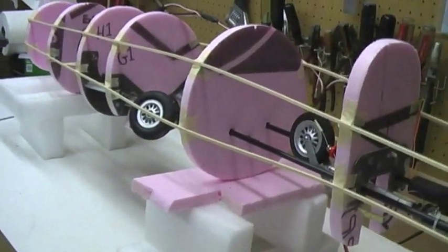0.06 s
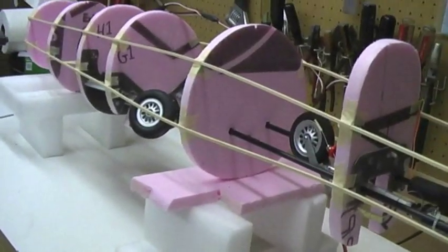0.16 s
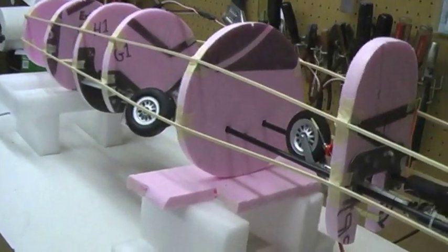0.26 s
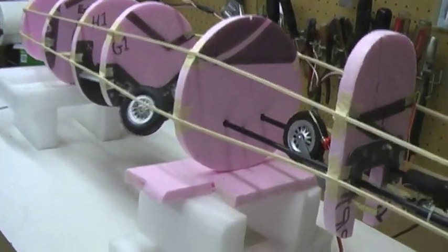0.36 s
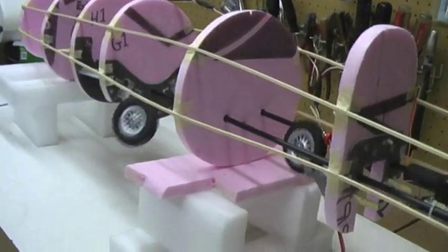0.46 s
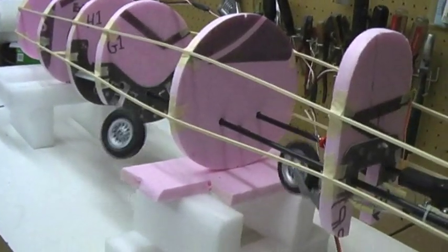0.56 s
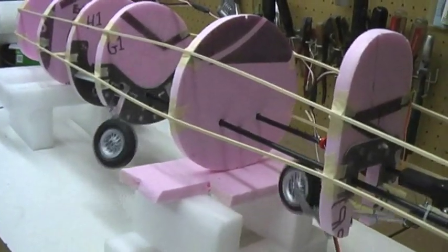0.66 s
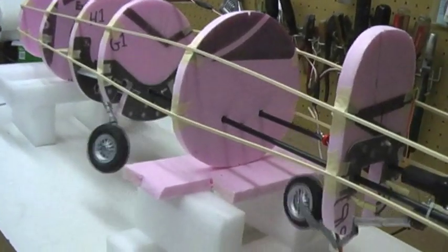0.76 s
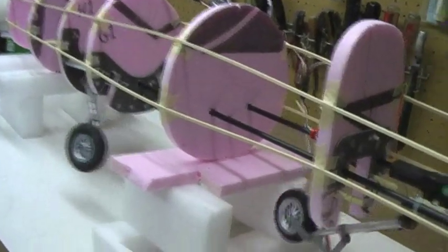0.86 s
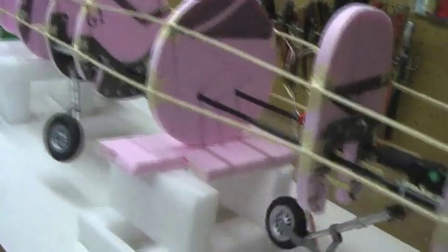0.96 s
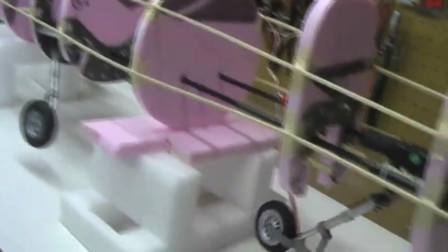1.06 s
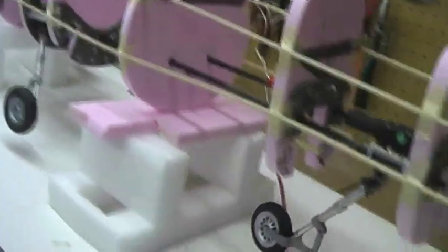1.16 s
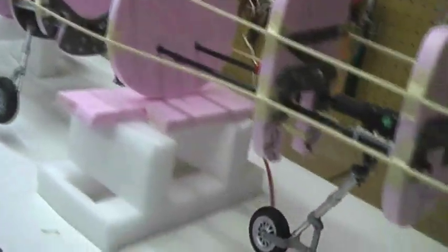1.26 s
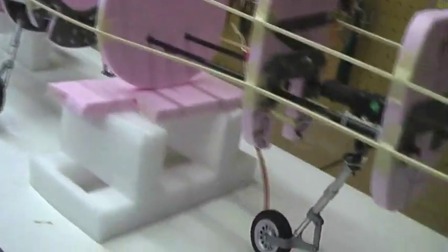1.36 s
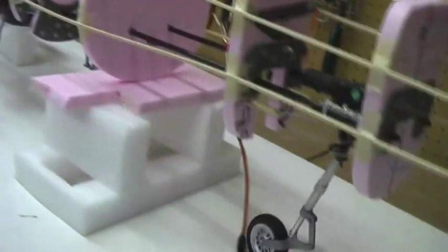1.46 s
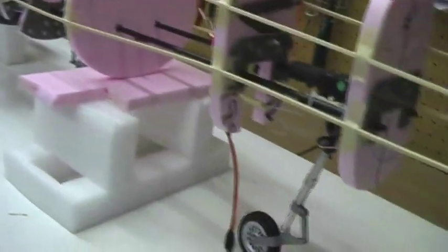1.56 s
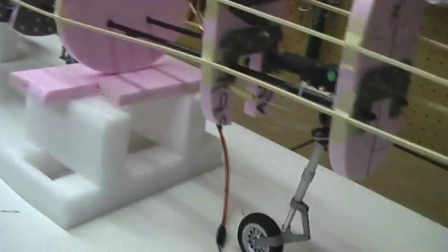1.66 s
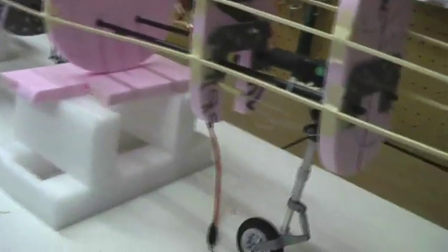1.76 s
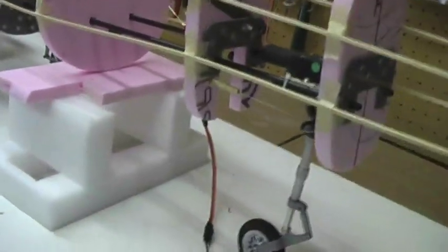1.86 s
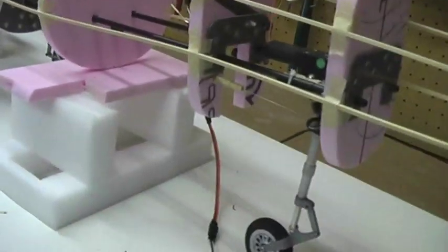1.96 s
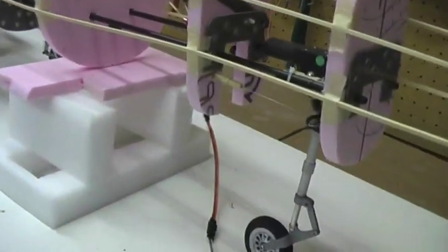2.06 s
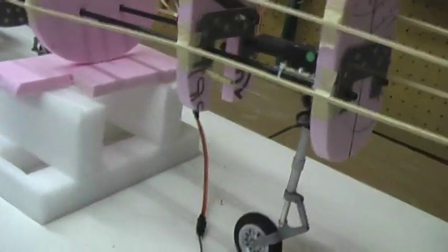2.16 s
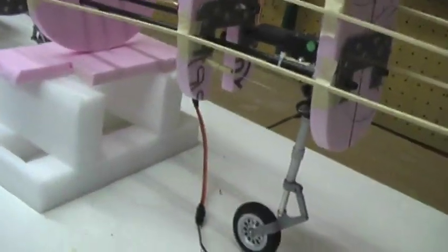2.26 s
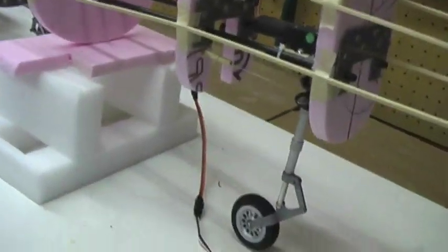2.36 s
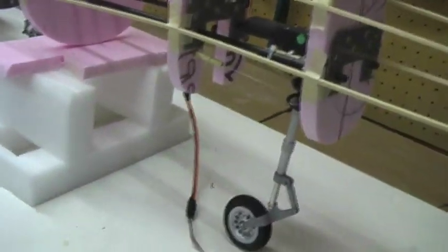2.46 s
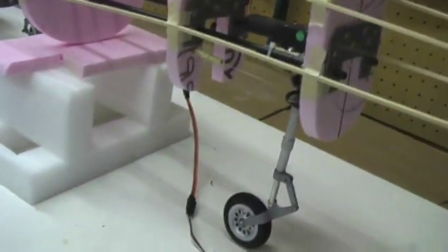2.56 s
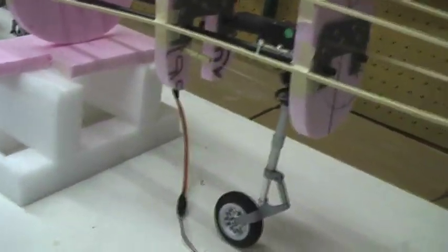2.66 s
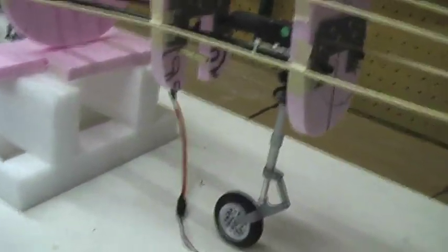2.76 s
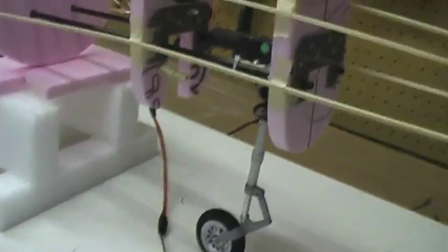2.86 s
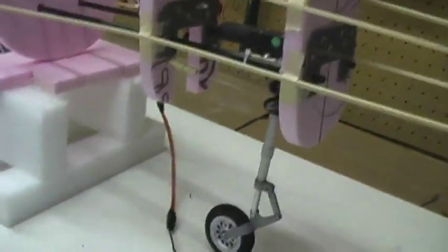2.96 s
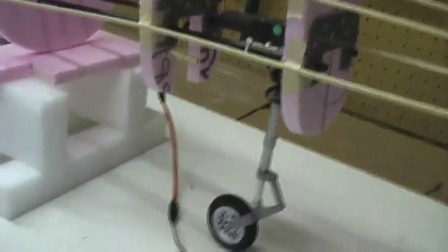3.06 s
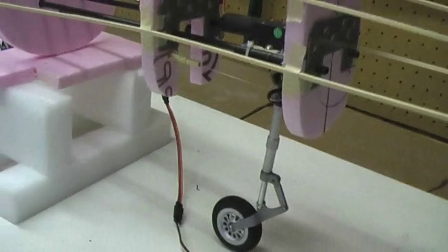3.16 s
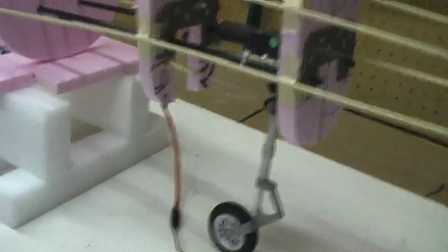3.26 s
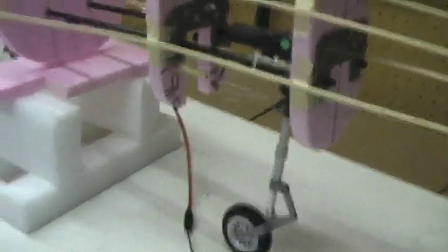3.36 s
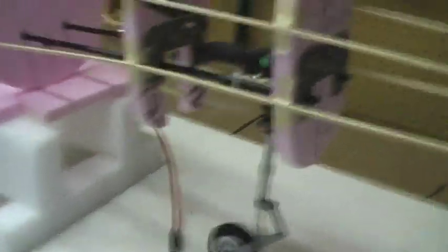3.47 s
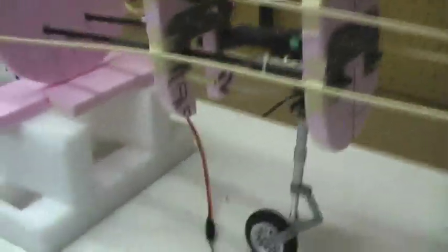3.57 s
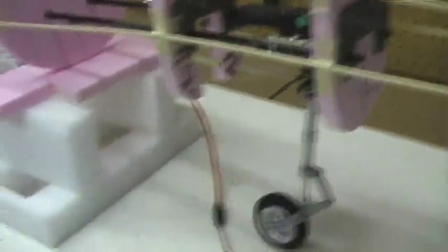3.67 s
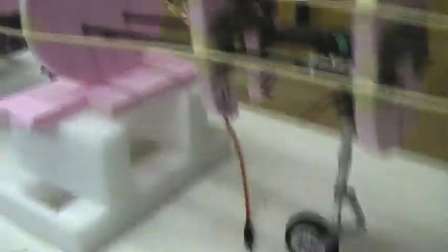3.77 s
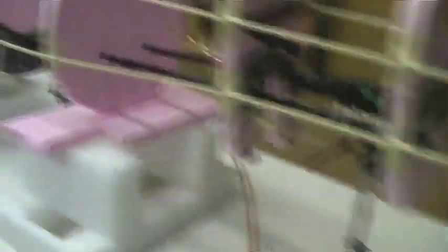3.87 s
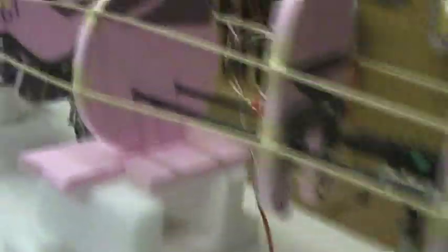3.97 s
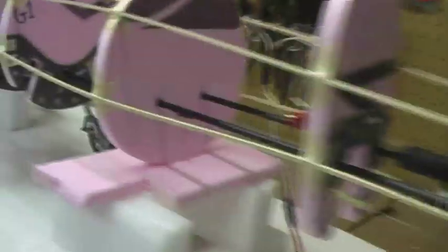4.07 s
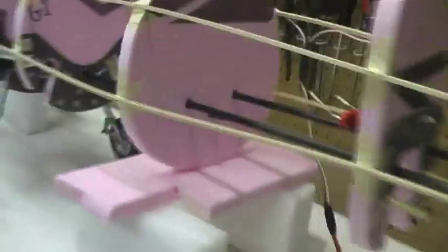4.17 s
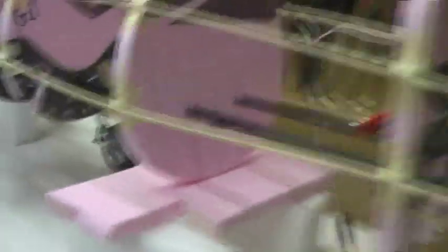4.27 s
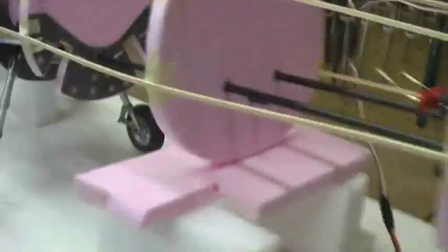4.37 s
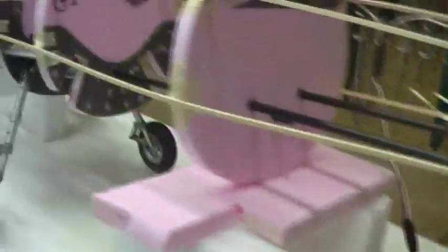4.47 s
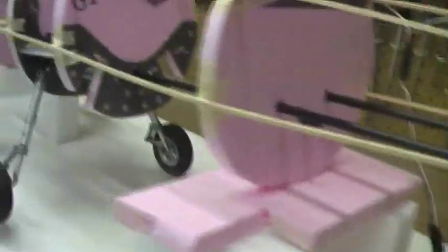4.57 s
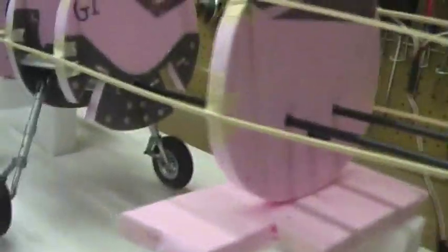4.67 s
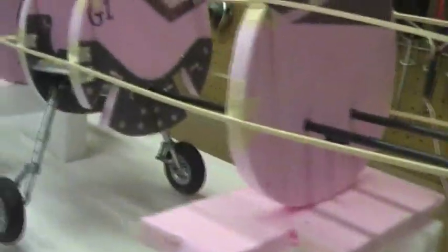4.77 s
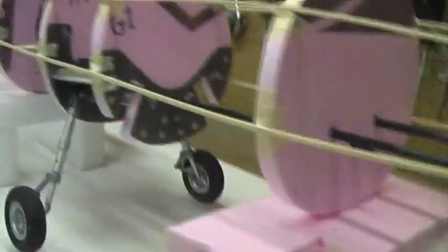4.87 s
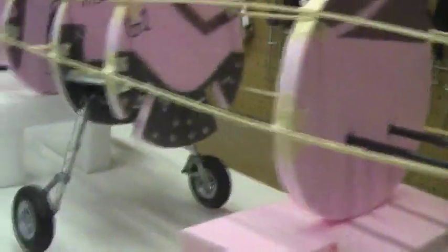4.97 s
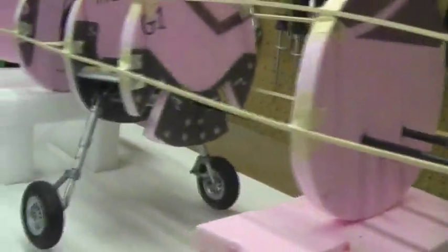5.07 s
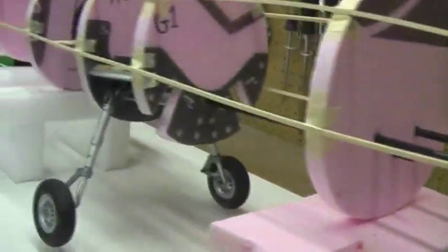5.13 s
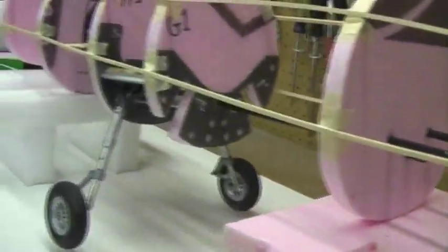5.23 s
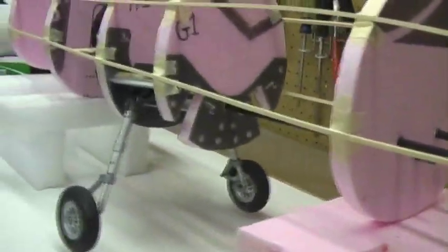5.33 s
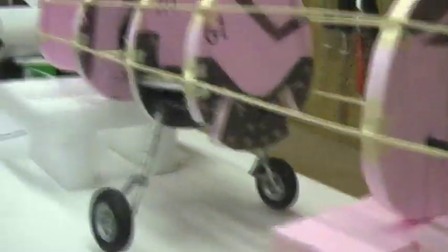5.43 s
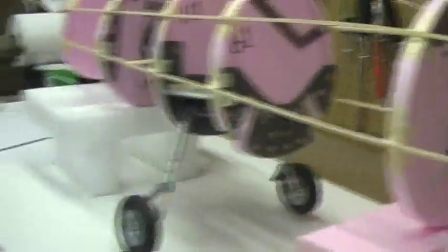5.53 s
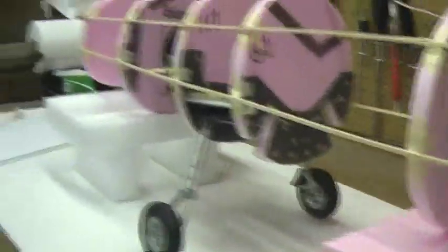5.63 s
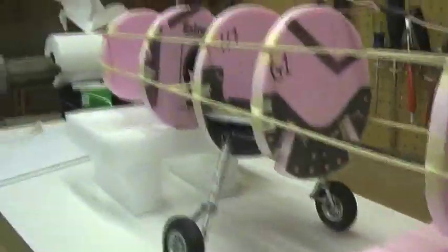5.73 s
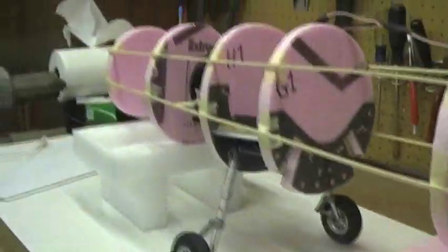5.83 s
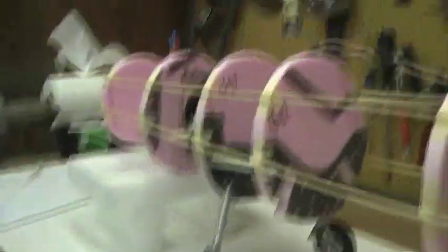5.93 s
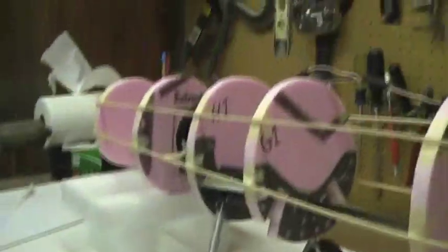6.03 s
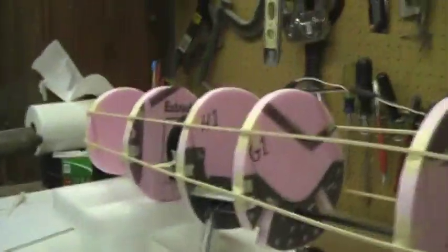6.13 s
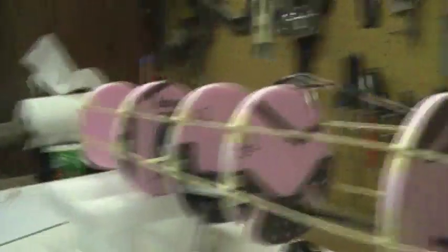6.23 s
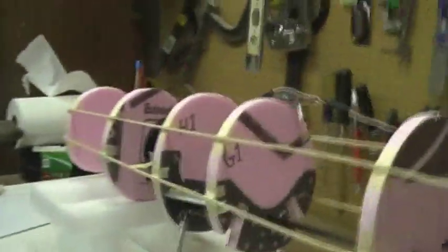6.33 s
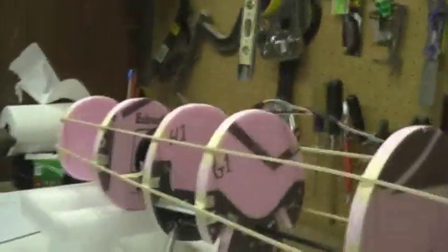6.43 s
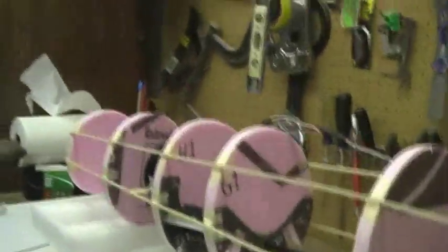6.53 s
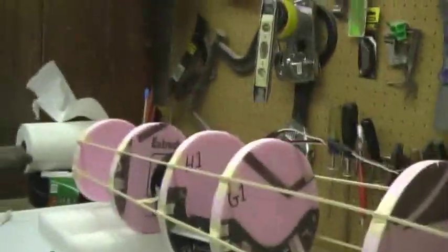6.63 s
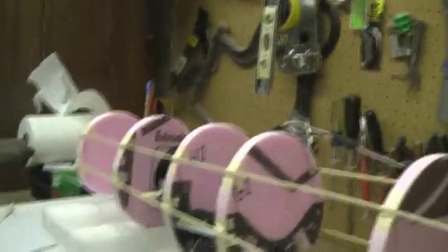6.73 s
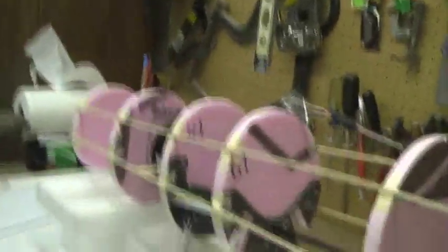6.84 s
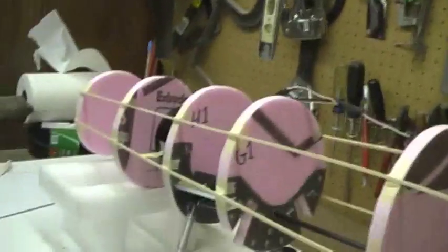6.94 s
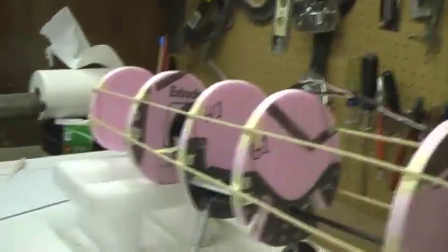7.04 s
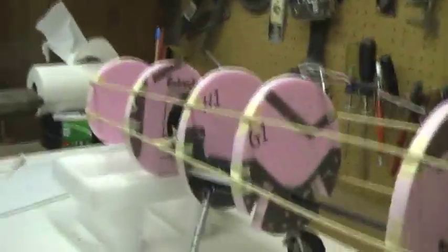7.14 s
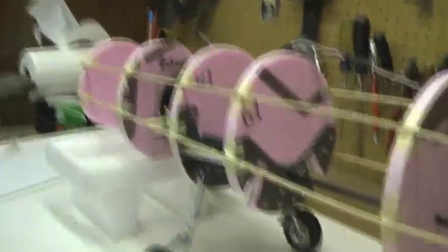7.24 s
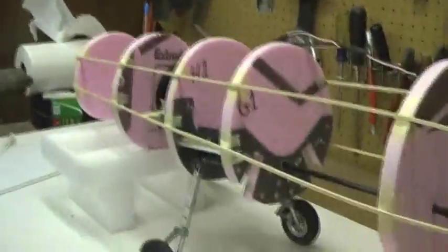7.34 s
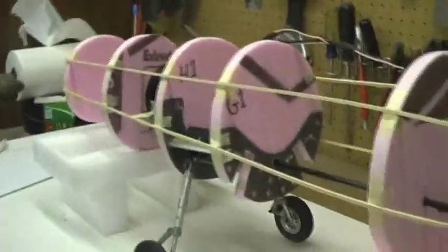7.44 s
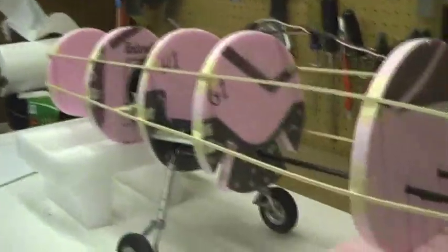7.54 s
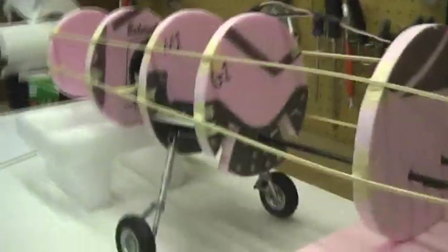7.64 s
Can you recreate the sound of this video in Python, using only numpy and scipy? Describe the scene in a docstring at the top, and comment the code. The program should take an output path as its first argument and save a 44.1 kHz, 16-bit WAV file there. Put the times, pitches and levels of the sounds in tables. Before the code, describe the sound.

A small, quiet workshop with low room tone and soft hiss, heard through a close stereo microphone. A very faint scuff comes at 0.15 s. At 0.3 s three tiny geared motors start abruptly, filling the centre with a bright, buzzy whine and gritty plastic grinding, slightly beating pitches and a low rotor hum. One motor drops out near 1.7 s and another by 1.8; the nearest labours downward in steps to its lowest around 2.0, climbs again and stops at 2.2 with a brief metallic strut ring. Quiet until faint hollow creaks at 3.1-3.4, then shoes shuffle from 3.5 to 4.7, strongest at 3.8-4.1, with dull knocks, small ticks and a tiny rising rubber squeak at 4.37. Near silence follows, with isolated faint ticks around 5.1-5.3. From 6.26 a hand brushes a surface; from 6.6 sharp ticks, short hollow knocks and crisp rustling cluster close by, drifting left until the end at about 7.7.

```python
"""A faint scuff in a quiet, cluttered room; then three geared motors swing a foam model's landing gear down.
Plastic gear teeth whine (a pulse per tooth contact) and grind (dense random contacts); a strut rings along.
After they stop, someone shuffles along the workshop bench: soles scuff (grains of friction), something creaks,
and a handled thing rustles (more grains), ticks and knocks (dying rings). A close stereo microphone hears it."""
import sys
import numpy as np
from scipy import signal
from scipy.fft import rfft, irfft
from scipy.io import wavfile

SR = 44100
rng = np.random.default_rng(int(sys.argv[2]) if len(sys.argv) > 2 else 0)


def transcribe(signal):
    """Save signal, clipped to [-1, 1], as a 16-bit WAV file at the path in sys.argv[1]."""
    frames = np.atleast_2d(signal).T
    limited = np.clip(frames, -1, 1)
    pcm = np.round(limited * 32767).astype(np.int16)
    wavfile.write(sys.argv[1], SR, pcm)


def gain_from_decibels(decibels):
    """Convert decibel values to linear amplitude factors."""
    exponent = np.asarray(decibels, float) / 20
    return 10 ** exponent


N = 339570   # length of the scene [samples]

# Every table of resonances lists its strength before the lift_db that its user adds.
# broad colour of the room tone: (frequency [Hz], level [dB per Hz])
ROOM_TONE = [(12, -67.5), (20, -50), (45, -4), (107, -5), (234, -11), (284, -20.5), (397, -2.5), (587, -14),
             (675, -10.5), (1030, -13.5), (1600, -16), (1740, -18.5), (9850, -31), (14600, -34.5),
             (15800, -47)]
# hums in the room tone: (frequency [Hz], width [Hz], strength [dB])
ROOM_HUMS = [(256, 28, 2), (405, 200, -6), (815, 15, 1.5)]
# the part of the room tone that each port hears alone: (frequency [Hz], gain [dB])
OWN_HISS = [(60, -6.5), (300, -11.5), (1400, 3.0), (4000, -3.0), (15000, 9.0)]
# echoes in the bass, middle and treble: (typical frequency [Hz], time to fall 60 dB [s])
ROOM_DECAY = [(200, 0.5), (2000, 0.16), (10000, 0.191)]
# what the two ports hear unlike each other, before each source's share: (frequency [Hz], side to mid [dB])
SCATTER = [(60, -16), (130, -14.5), (290, -29.5), (640, -17.5), (1410, -36.5), (3100, -14.5), (6820, -10.5),
           (15000, 2)]
# a gentle treble shelf, then a steep cutoff near 15.3 kHz: (frequency [Hz], gain [dB])
TREBLE_CUTOFF = [(20, 0), (12500, 0), (14000, -4), (15100, -3), (15500, -30), (20000, -40)]

# colour of a sole on the floor: (frequency [Hz], level [dB per Hz])
SCUFF = [(35, -57), (60, -32.5), (175, -4.5), (426, -7), (577, -10), (663, -4), (1190, -5), (2230, -7),
         (11400, -11), (14100, -22), (15800, -63)]
# hollow rings of the floor: (frequency [Hz], width [Hz], strength [dB])
SCUFF_MODES = [(494, 64, 1), (2310, 400, -3), (3500, 400, -12)]
# weight rolls onto a foot, dull:
# (peak time [s], rumble [dB], body against rumble [dB], rise by 20 dB [s], fall by 20 dB [s])
TREADS = [(.15, -68, 8, .1, .13), (3.3, -57, 0, .35, .6), (3.47, -58, 10, .12, .09),
          (3.575, -53, -1, .07, .1), (3.682, -57, 7, .02, .08), (3.76, -45, -2, .008, .2),
          (3.9, -39, -7, .015, .085), (3.99, -62, 7, .1, .2), (4.07, -50, 1, .01, .2),
          (4.13, -47, 5, .12, .065), (4.38, -53, -4, .06, .03), (4.45, -51, -2, .05, .25),
          (4.51, -51, -2, .1, .07), (4.7, -56, 1, .11, .16), (5.46, -73, 14, .12, .08)]
# a sole slides, bright:
# (peak time [s], scratch [dB], hiss against scratch [dB], rise by 20 dB [s], fall by 20 dB [s])
SLIDES = [(.126, -62, -6, .09, .13), (3.33, -63, -2, .22, .4), (3.472, -39.5, -7, .055, .07),
          (3.57, -58, -5, .1, .2), (3.685, -48.5, -7, .025, .085), (3.825, -36, -3.5, .075, .085),
          (3.99, -53, -2, .6, .14), (4.1, -31.5, -13, .028, .08), (4.27, -64, -1, .3, .3),
          (4.38, -59, 4, .12, .15), (4.49, -46.5, -3, .1, .07), (4.67, -55.5, -5, .11, .2),
          (5.46, -70, 15, .13, .06), (6.1, -68, -3, 1.5, .5)]
# something hollow creaks under the shifting weight:
# (peak time [s], level [dB], ring [Hz], rise by 20 dB [s], fall by 20 dB [s])
CREAKS = [(3.115, -58, 490, .02, .5), (3.18, -57, 480, .15, .12), (3.25, -52, 510, .04, .1),
          (3.315, -56, 1310, .06, .09), (3.385, -55, 520, .08, .08)]
# colour of the slips behind a creak: (frequency [Hz], level [dB per Hz])
CREAK_SLIPS = [(20, -30), (1500, -30), (6000, -55), (20000, -60)]

# a hand brushes a surface:
# (peak time [s], hiss [dB], low rub against hiss [dB], rise by 20 dB [s], fall by 20 dB [s])
BRUSHES = [(6.264, -47.5, -6, .012, .14), (6.35, -55, -8, .1, .6), (6.46, -48, -9, .17, .2),
           (6.53, -54, 1, .2, .2), (6.65, -53.5, 3, .2, .17), (6.78, -53, -4, .2, .02)]
# colour of the handled material: (frequency [Hz], level [dB per Hz])
RUSTLE = [(35, -42.5), (60, -15), (113, 1), (146, -11), (216, 3.5), (307, -2), (501, -6.5), (619, -11),
          (818, -5.5), (3020, -10.5), (6090, -2), (14400, -21), (15800, -31.5)]
# the handled material over time: (time [s], low rustle [dB], bright rustle [dB])
HANDLING = [(6.785, -44, -42.5), (6.83, -52, -45), (6.975, -53, -48), (7.005, -55, -42), (7.12, -53, -43.5),
            (7.245, -58, -44), (7.256, -60, -39), (7.305, -58, -42), (7.32, -64, -48), (7.39, -52, -42.5),
            (7.443, -50, -43), (7.51, -57, -52), (7.575, -67, -60.5), (7.63, -57, -55), (7.7, -56, -47.5)]
# where the handling is heard: (time [s], left over right [dB])
HANDLING_PAN = [(6.2, -1.5), (6.7, 1.5), (7.2, 1.5), (7.7, 5.5)]
# sharp ticks: (time [s], level before ring and crack take their shares [dB], ring [Hz])
TICKS = [(3.6731, -39.5, 3090), (4.0634, -36.5, 4590), (4.2383, -39, 2500), (4.4144, -40, 6940),
         (4.4308, -38.5, 2570), (5.119, -40, 4100), (5.255, -50, 4100), (6.6104, -32.5, 4560),
         (6.6478, -21.5, 4350), (6.6544, -24, 3900), (6.7855, -15.5, 5820), (6.7974, -23.5, 6270),
         (6.8054, -19.5, 6950), (6.8179, -29, 4470), (6.8473, -23, 6820), (7.1184, -25.5, 4240),
         (7.1754, -29.5, 6230), (7.226, -23.5, 5444), (7.2509, -15, 2740), (7.259, -25, 2400),
         (7.267, -27, 3300), (7.2774, -16, 5540), (7.2953, -18.5, 5245), (7.3372, -30, 4490),
         (7.3637, -21.5, 5740), (7.438, -25.5, 6330), (7.6161, -30.5, 5750), (7.649, -31, 5830)]
# the ticking thing moves left: (time [s], left over right [dB])
TICK_PAN = [(6.2, -1.5), (6.9, 2.5), (7.3, 5), (7.7, 8)]
# colour of a tick's crack: (frequency [Hz], level [dB per Hz])
SNAP = [(500, -26.5), (2000, -2), (3000, -0.5), (6500, -2.5), (10000, -9.5), (15000, -19)]
# dull knocks: (time [s], level before each ring takes its share [dB], main ring [Hz], fall by 60 dB [s])
KNOCKS = [(3.671, -51, 466, 0.04), (3.758, -35.5, 470, 0.058), (3.89, -27, 450, 0.037),
          (4.064, -33, 356, 0.048), (4.411, -36, 650, 0.034), (4.43, -36.5, 1030, 0.04),
          (4.443, -40, 236, 0.089), (4.684, -41.5, 248, 0.05), (6.263, -40, 215, 0.077),
          (6.586, -31.5, 234, 0.02), (6.654, -19, 816, 0.032), (6.687, -34, 315, 0.031),
          (6.788, -19, 1290, 0.013), (6.798, -17, 1368, 0.013), (6.815, -30, 363, 0.018),
          (6.85, -35, 186, 0.04), (6.884, -28, 369.5, 0.021), (6.939, -28, 228, 0.044),
          (6.967, -31, 197, 0.025), (7.422, -35, 790, 0.036), (7.585, -45, 363, 0.032),
          (7.616, -28.5, 490, 0.037), (7.649, -28.5, 580, 0.044)]
# rings within one knock: (times the main pitch, level [dB], times the main fall time)
KNOCK_RINGS = [(1, -3.5, 1), (1.35, -8, 1.1), (1.75, -8, .9), (2.3, -12, .5), (2.9, -11, .4)]
# a rubber sole slips: (time [s], length [s], first pitch [Hz], last pitch [Hz], peak [dB])
SQUEAK = (4.366, .029, 360, 530, -32)

# broad colour of the gearboxes: (frequency [Hz], level [dB per Hz])
GEARBOX = [(59, -68.5), (100, -44), (214, -29.5), (593, -20), (646, -15), (887, -13.5), (1300, 0.5),
           (3520, -1.5), (4440, -6), (7230, -7.5), (8940, -3.5), (14600, -11), (15800, -44.5)]
# resonances of the gearboxes: (frequency [Hz], width [Hz], strength [dB])
GEARBOX_MODES = [(1088, 130, -6.5), (1313, 95, -5.5), (2770, 150, -9), (3136, 140, -10), (4410, 130, -2.5),
                 (5180, 120, -5), (5750, 100, -7), (6460, 180, -6.5), (8920, 1400, -9.5),
                 (10160, 200, -7.5)]
# the grinding eases while the near motor labours: (time [s], gain [dB])
GRIND_EASES = [(1.63, 0.5), (1.75, -2.5), (2.09, -3), (2.17, -6), (2.22, 1.5)]
# bass band of the grinding against the whole: (time [s], gain [dB])
GRIND_BASS = [(.5, -21), (1.3, -26), (1.65, -19), (1.92, -20), (2.13, -25), (2.3, -24)]
# treble band of the grinding against the whole: (time [s], gain [dB])
GRIND_TREBLE = [(.32, -5), (.35, 7), (.5, 1), (1.27, 2), (1.63, -1), (1.75, 4.5), (1.92, -3), (2.08, -8),
                (2.11, 4), (2.185, 7), (2.2, -6.5), (2.32, -17)]
# how the housing radiates the tooth whine: (frequency [Hz], gain [dB])
WHINE = [(900, -14.5), (1400, -5), (2300, -4.5), (3200, -7), (4500, -3.5), (5300, -1.5), (6800, -5),
         (8700, 2.5), (10200, -3.5), (12000, -5.5), (15000, -27.5)]
# the near motor spins up, labours in steps and recovers as its leg locks: (time [s], tooth contacts [per s])
NEAR_SPEED = [(.33, 1200), (.385, 1750), (.408, 1750), (.428, 2060), (.8, 2205), (1.75, 2215),
              (1.793, 1765), (1.84, 1775), (1.868, 1465), (1.895, 1445), (1.912, 1190), (1.953, 1125),
              (1.98, 1185), (2.008, 1022), (2.043, 1168), (2.08, 1095), (2.097, 1390), (2.135, 1450),
              (2.156, 1685), (2.193, 1700)]
# one list for each far motor: (time [s], tooth contacts [per s])
FAR_SPEEDS = [
    [(.36, 1700), (.45, 1890), (.6, 1945), (.8, 1985), (1.2, 1960), (1.8, 1930)],
    [(.4, 2000), (.6, 2280), (.9, 2325), (1.45, 2345), (1.5, 2290), (1.685, 2280), (1.705, 1900),
     (1.725, 1550)],
]
# force on the near motor's teeth: (time [s], level [dB])
NEAR_FORCE = [(.33, -35), (.41, -22), (.6, -26.5), (1.0, -33), (1.3, -25), (1.7, -28), (1.8, -21),
              (1.93, -23.5), (2.06, -21), (2.193, -20.5)]
# force on the teeth, one list for each far motor: (time [s], level [dB])
FAR_FORCES = [
    [(.36, -40.5), (.55, -31), (.8, -33.5), (1.2, -39.5), (1.8, -37)],
    [(.4, -42.5), (.9, -29.5), (1.2, -32), (1.45, -33.5), (1.6, -32.5), (1.7, -28), (1.725, -44)],
]
# hum of a three-pole rotor, average levels before they drift:
# (time [s], turns [per s], once a turn [dB], three a turn [dB], six a turn [dB])
ROTOR = [(0.42, 208.7, -67, -49, -50), (0.53, 240, -50.5, -56.5, -43.5), (0.658, 212, -63, -50.5, -51.5),
         (0.76, 222, -55.5, -44, -53.5), (1.404, 214.3, -62, -49, -38), (1.552, 227.1, -47, -44, -36),
         (1.894, 233, -62, -52, -38), (1.95, 228.9, -75.5, -62.5, -47)]


def rms_one(x):
    """Scales a sound to an average (rms) level of 1."""
    return x / np.sqrt(np.mean(x ** 2) + 1e-20)


def in_time(rows):
    """Gives a gate that is open while a curve lasts, then the curve's columns at every sample."""
    s, *columns = np.transpose(rows)
    t = np.arange(N) / SR
    gate = np.clip(np.minimum(t - s[0], s[-1] - t) / .006 + 1, 0, 1)   # 6 ms fades just outside the curve
    return [gate] + [np.interp(t, s, c) for c in columns]


def colour(x, spectrum, modes=(), lift_db=0., low_hz=1, high_hz=30000):
    """Filters by a broad spectrum with resonances on top, between two soft edges."""
    hz = np.fft.rfftfreq(x.shape[-1], 1 / SR) + 1
    power = 1 + sum(gain_from_decibels(2 * (db + lift_db)) / (1 + (2 * (hz - f) / width) ** 2) for f, width, db in modes)
    edges = 1 / np.sqrt((1 + (low_hz / hz) ** 8) * (1 + (hz / high_hz) ** 8))
    points_hz, points_db = np.transpose(spectrum)
    broad = gain_from_decibels(np.interp(np.log(hz), np.log(points_hz), points_db))
    return irfft(rfft(x) * broad * np.sqrt(power) * edges, x.shape[-1])


def drift(rate_hz):
    """Makes a random wander of average size 1: noise smoothed twice, so it changes slowly."""
    r = np.exp(-2 * np.pi * rate_hz / SR)
    noise = rng.standard_normal(N + SR)
    return rms_one(signal.lfilter([1], [1, -2 * r, r * r], noise)[SR:])   # drop the first second, still settling


def grit(per_s, spread_db):
    """Makes dense random contacts: clicks of uneven size, either way up, at chance moments."""
    sizes = gain_from_decibels(spread_db * np.minimum(rng.exponential(1, N), 5)) * rng.choice([-1, 1], N)
    return sizes * (rng.random(N) < per_s / SR)


def rubbing(gains, spectrum, modes, per_s, clump_db):
    """Friction: grains in clumps, split into rumble, body, scratch and hiss with a gain each."""
    grains = grit(per_s, spread_db=1.5) * gain_from_decibels(clump_db * drift(38.0))
    edges_hz = [20, 450, 1500, 4000, 30000]
    parts = [rms_one(colour(grains, spectrum, modes, 5.7, lo, hi)) for lo, hi in zip(edges_hz, edges_hz[1:])]
    return sum(gain * part for gain, part in zip(gains, parts))


def strokes(s, db, rise_s, fall_s):
    """Makes swells that rise to a peak and fall, straight in dB; the strongest one rules."""
    t = np.arange(0, N, 32)[:, None] / SR   # every 32nd sample is enough
    level_db = np.max(db - 20 * np.maximum((s - t) / rise_s, (t - s) / fall_s), axis=1)
    return np.interp(np.arange(N) / SR, t[:, 0], gain_from_decibels(level_db))


def two_bands(rows):
    """Gives the gains of the main band and of its companion for a table of strokes."""
    s, db, share_db, rise_s, fall_s = np.transpose(rows)
    return [strokes(s, db, rise_s, fall_s), strokes(s, db + share_db, rise_s, fall_s)]


def ring(at_s, peak_db, hz, t60):
    """One damped ring: its start sample and a sine that falls 60 dB in t60 seconds."""
    t = np.arange(int(t60 * SR)) / SR
    return round(at_s * SR), gain_from_decibels(peak_db - 60 * t / t60) * np.sin(2 * np.pi * hz * t)


def add(out, start, wave):
    """Mixes a short wave into a long sound, cut off at the end."""
    out[..., start:start + wave.shape[-1]] += wave[..., :N - start]


def place(x, pan_db, scatter_db):
    """Stereo: a level difference, plus reflections off bench and foam that reach the two ports unlike."""
    echoes = rng.standard_normal(5000) * np.exp(-np.arange(5000) / 1000)
    reflected = signal.fftconvolve(x, echoes / np.linalg.norm(echoes))[:N]
    side = colour(reflected, SCATTER) * gain_from_decibels(scatter_db)
    return np.array([(x + side) * gain_from_decibels(pan_db / 2), (x - side) * gain_from_decibels(-pan_db / 2)])


def room_tone():
    """Distant machinery and air, alike in both ports, over the microphone's own hiss."""
    shared, left, right = colour(rng.standard_normal((3, N)), ROOM_TONE, ROOM_HUMS, lift_db=8.0)
    own = colour(np.array([left, right]), OWN_HISS)
    level_db = -60.5 + drift(2) / 2
    return gain_from_decibels(level_db) * rms_one(shared + own)


def room(x):
    """Diffuse echoes: dying noise, its own in each channel; the bass dies slowest."""
    t, tail = np.arange(SR // 2) / SR, 0
    for (_, t60), (low_hz, high_hz) in zip(ROOM_DECAY, [(1, 700), (700, 5000), (5000, 30000)]):
        flat = [(20, 0), (20000, 0)]
        noise = colour(rng.standard_normal((2, len(t))), flat, (), 0, low_hz, high_hz)
        tail = tail + noise * gain_from_decibels(-60 * t / t60) * (t > .003)   # nothing for the first 3 ms
    tail = tail / np.sqrt(np.sum(tail ** 2) / 2)
    return signal.fftconvolve(x[None], tail, axes=1)[:, :N]


def creaks():
    """Something hollow: uneven slips ring in one narrow resonance for each creak."""
    slips, width_hz = grit(per_s=900., spread_db=3.0), 90
    out = 0
    for s, db, hz, rise_s, fall_s in CREAKS:
        hollow = rms_one(colour(slips, CREAK_SLIPS, [(hz, width_hz, 30)]))
        swell = strokes(*np.array([[s], [db], [rise_s], [fall_s]]))
        out = out + swell * hollow
    return out


def shuffling():
    """Soles on the floor: treads give rumble and body, slides scratch and hiss, clothes a faint bed."""
    clothes = in_time([(4.2, 0), (6.25, 0)])[0]   # from, to [s]
    clothes_db = [-74, -73, -74, -80]   # rumble, body, scratch, hiss
    gains = [gain + clothes * gain_from_decibels(db) for gain, db in zip(two_bands(TREADS) + two_bands(SLIDES), clothes_db)]
    return rubbing(gains, SCUFF, SCUFF_MODES, per_s=10000.0, clump_db=1.0) + creaks()


def handling():
    """A hand brushes along, then rustles what it holds; both are grains of friction."""
    hiss, rumble = two_bands(BRUSHES)
    brush_gains = [rumble, rumble * gain_from_decibels(-3), hiss * gain_from_decibels(-10), hiss]
    brush = rubbing(brush_gains, SCUFF, (), per_s=9000., clump_db=1.2)
    gate, low_db, bright_db = in_time(HANDLING)
    rustle_db = [low_db - 8, low_db, bright_db - 6, bright_db]   # rumble, body, scratch, hiss
    return brush + gate * rubbing(gain_from_decibels(rustle_db), RUSTLE, (), per_s=9000., clump_db=1.2)


def ticks():
    """Each tick is a ring that dies in 16 ms over a broad crack and its short rattle."""
    out, t = np.zeros((2, N)), np.arange(2048) / SR
    noises = rng.standard_normal((len(TICKS), 2048))
    for (s, db, hz), noise in zip(TICKS, noises):
        start, wave = ring(s, db - 7.0, hz, t60=0.016)
        pan_db = np.interp(s, *np.transpose(TICK_PAN))
        sides = gain_from_decibels([[pan_db / 2], [-pan_db / 2]])
        crack = gain_from_decibels(-6.0 - 60 * t / 0.0043)
        rattle = gain_from_decibels(-19 - 60 * t / 0.04)
        add(out, start, wave * sides)
        add(out, start, gain_from_decibels(db) * (crack + rattle) * rms_one(colour(noise, SNAP)) * sides)
    return out


def squeak():
    """A slipping rubber sole: a short tone whose pitch climbs evenly while it swells and fades."""
    s, length, from_hz, to_hz, db = SQUEAK
    t = np.arange(int(length * SR)) / SR
    swell = np.sin(np.pi * (t / length) ** 1.4) ** .7
    cycles = from_hz * t + (to_hz - from_hz) * t ** 2 / length / 2
    return round(s * SR), gain_from_decibels(db) * swell * np.sin(2 * np.pi * cycles)


def knocks():
    """Hollow knocks: a main ring and four higher ones, all dying; the squeak is mixed in."""
    out = np.zeros(N)
    for s, db, hz, t60 in KNOCKS:
        for ratio, ring_db, share in KNOCK_RINGS:
            add(out, *ring(s, db + ring_db, hz * ratio, t60 * share))
    add(out, *squeak())
    return out


def strut(x):
    """A metal strut: one narrow resonance driven by the gear noise, which it outlasts."""
    ring_hz, t60_s, level_db = 4400, .26, -9
    r, w = gain_from_decibels(-60 / (t60_s * SR)), 2 * np.pi * ring_hz / SR
    resonator = np.array([1, 0, -1]) * (1 - r * r) / 2, [1, -2 * r * np.cos(w), r * r]
    return gain_from_decibels(level_db) * signal.lfilter(*resonator, x)


def rotor_hum():
    """The turning three-pole rotor: sines at one, three and six times its speed, each drifting in level."""
    gate, turns, *orders_db = in_time(ROTOR)
    angle = 2 * np.pi * np.cumsum(turns * (1 + .004 * drift(18.0))) / SR
    hum = sum(gain_from_decibels(db + 2.5 * drift(12.)) * np.sin(k * angle) for k, db in zip((1, 3, 6), orders_db))
    return np.sqrt(2) * gate * hum   # from average level to peak


def grinding():
    """All gear trains: dense tooth contacts through the gearbox resonances, in three bands."""
    start_s, stop_s, run_db = .317, 2.225, -23
    t = np.arange(N) / SR
    since = np.maximum(t - start_s, 0)
    build_up_db = -11 * np.exp(-since / .045)
    run_down_db = -310 * np.maximum(t - stop_s, 0)   # 310 dB per second after the last motor stops
    level_db = run_db + build_up_db + run_down_db + in_time(GRIND_EASES)[1]
    gain = np.minimum(since / .006, 1) * gain_from_decibels(level_db)
    contacts = grit(per_s=14000., spread_db=2.2) * gain_from_decibels(.8 * drift(25.))
    out = 0
    for low_hz, high_hz, band_db in [(60, 578, in_time(GRIND_BASS)[1]), (900, 6330, -3.7),
                                     (5720, 27300, in_time(GRIND_TREBLE)[1])]:
        band = rms_one(colour(contacts, GEARBOX, GEARBOX_MODES, 12.0, low_hz, high_hz))
        out = out + gain_from_decibels(band_db) * band
    return gain * out


def teeth(speed, force, wobble, uneven_db, dull_db=0):
    """One smeared pulse per tooth contact; speed wobbles; random flutter of each harmonic roughens the whine."""
    (gate, per_s), force_db = in_time(speed), in_time(force)[1]
    turn = 2 * np.pi * np.cumsum(per_s * (1 + wobble * (drift(25.) + drift(250.)))) / SR
    flutter, pulses = drift(80.), 0
    for k, (smear, shift) in enumerate(rng.random((14, 2)), start=1):
        own_flutter = np.roll(flutter, int(shift * N))
        gain = gain_from_decibels(uneven_db * own_flutter - dull_db * k)   # dull_db: distance dulls the upper harmonics
        audible = k * per_s < 15500
        pulses = pulses + gain * np.cos(k * turn + 2 * np.pi * smear) * audible
    whine = colour(pulses * gate, WHINE, GEARBOX_MODES, lift_db=11.0)
    return whine / np.sqrt(np.mean(whine[gate > 0] ** 2)) * gain_from_decibels(force_db)


def motors():
    """Three geared motors: grinding, tooth whine of each, the strut they shake, and rotor hum."""
    gears = grinding() + teeth(NEAR_SPEED, NEAR_FORCE, wobble=.011, uneven_db=5.0)
    for speed, force in zip(FAR_SPEEDS, FAR_FORCES):
        gears = gears + teeth(speed, force, wobble=.004, uneven_db=4.0, dull_db=4)
    return gears + strut(gears) + rotor_hum()


def scene():
    """Places every source between left and right, then adds the room tone and the echoes."""
    gear, bumps, snaps = motors(), knocks(), ticks()
    steps, hands = shuffling(), handling()
    out = place(gear, -.6, -2.5) + place(steps, -0.54, 1.3) + place(hands, in_time(HANDLING_PAN)[1], 2.5)
    out = out + place(bumps, 0.88, 1.5) + snaps + room_tone()
    to_room = gain_from_decibels(-15) * (gear + bumps + snaps.mean(axis=0)) + gain_from_decibels(-8.5) * (steps + hands)
    return out + room(to_room)


def low_pass(x):
    """Removes everything above the highest recorded frequency."""
    return signal.sosfilt(signal.butter(12, 15990, fs=SR, output="sos"), x)


def record(dry):
    """The microphone drops the deepest bass; the treble dips gently, then is cut off near 15.3 kHz."""
    bass_cut = signal.butter(2, 82, "high", fs=SR, output="sos")   # below 82 Hz
    heard = signal.sosfilt(bass_cut, colour(dry, TREBLE_CUTOFF))
    return low_pass(heard)


dry = scene()
out = record(dry)
transcribe(out)
```